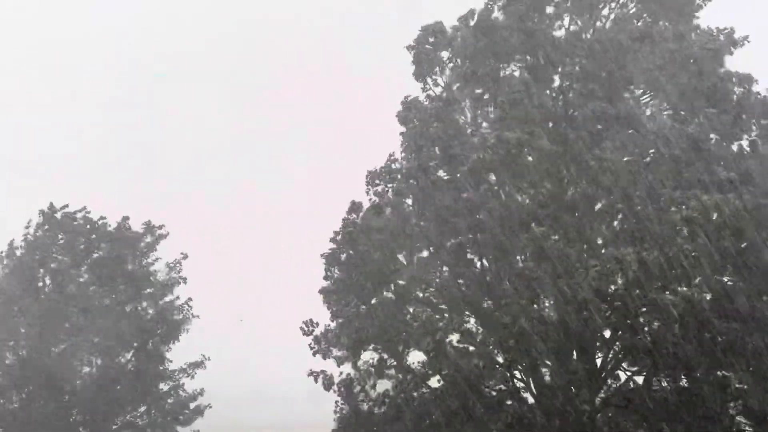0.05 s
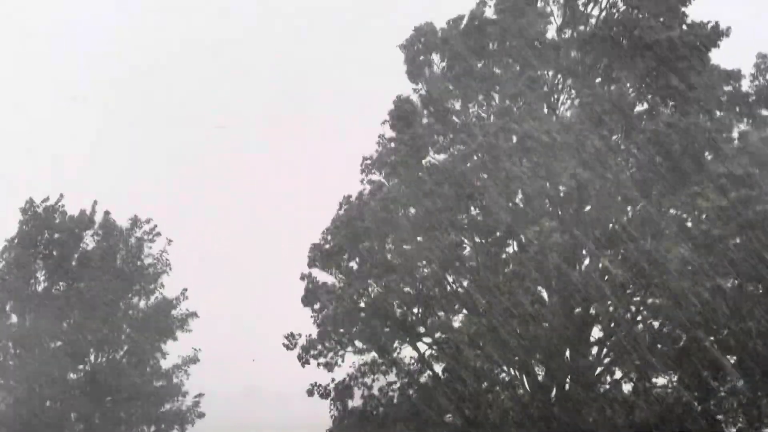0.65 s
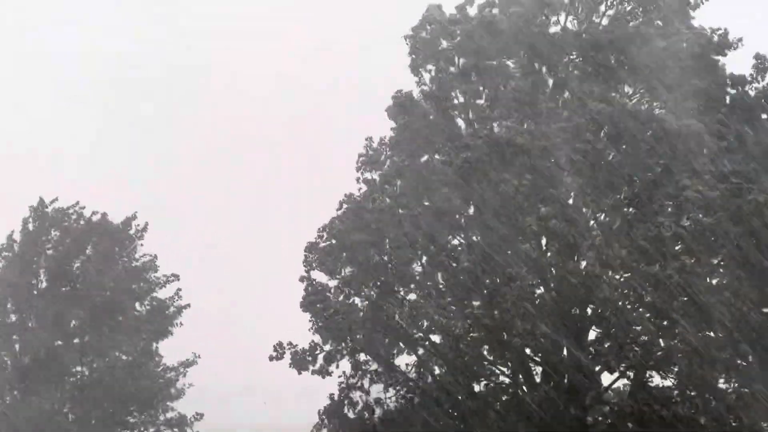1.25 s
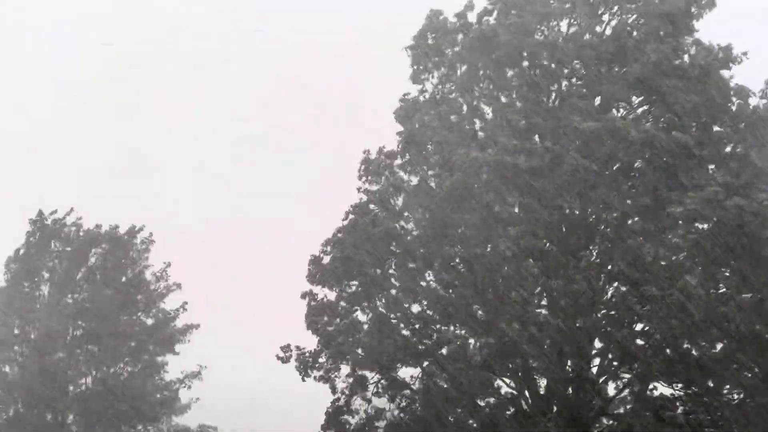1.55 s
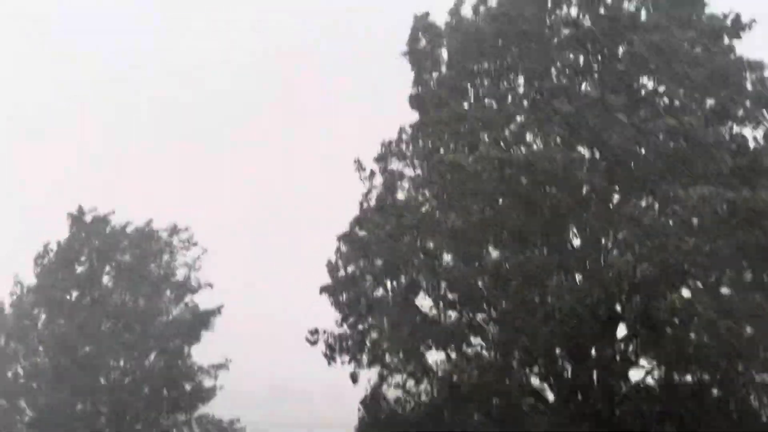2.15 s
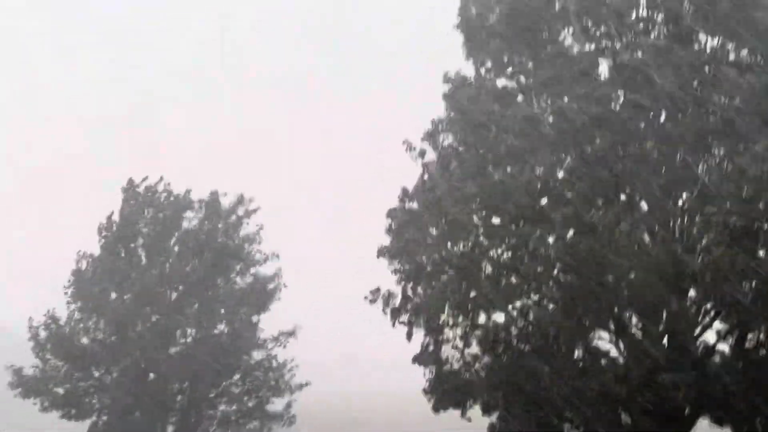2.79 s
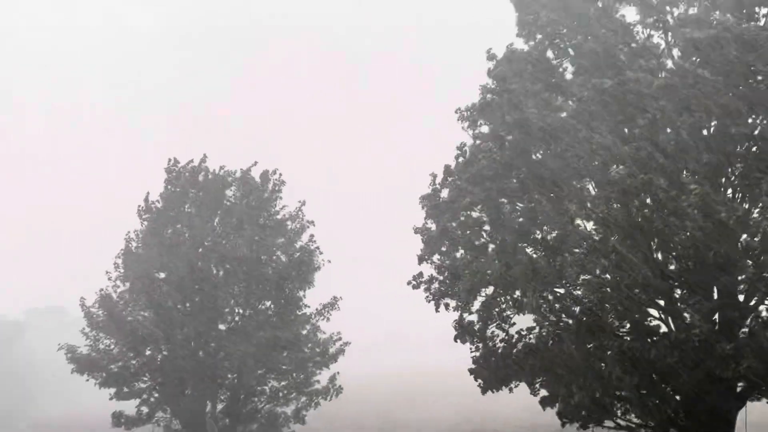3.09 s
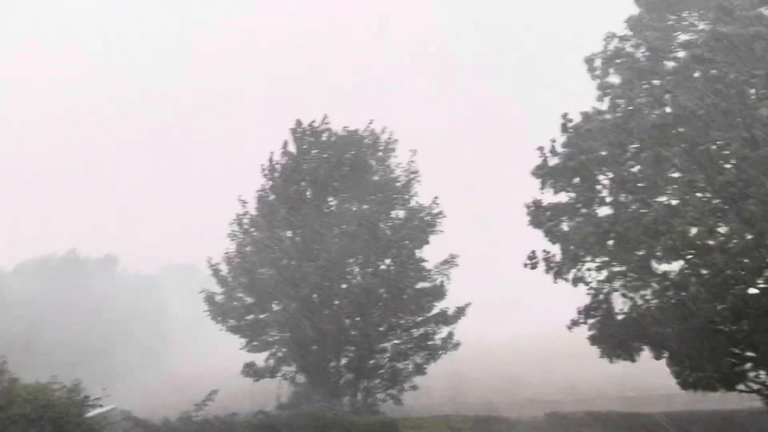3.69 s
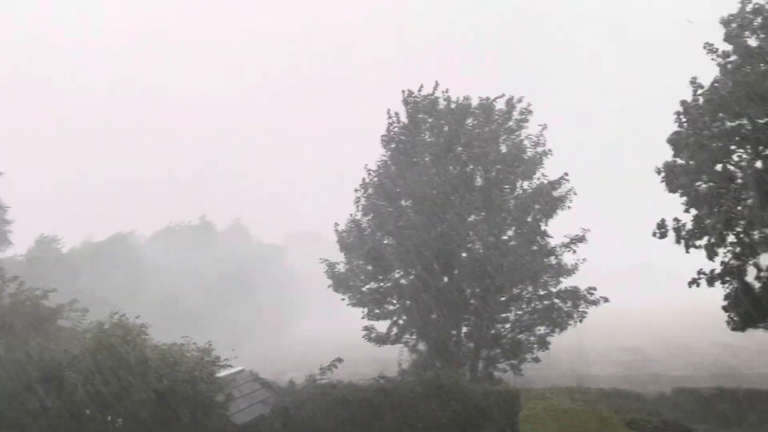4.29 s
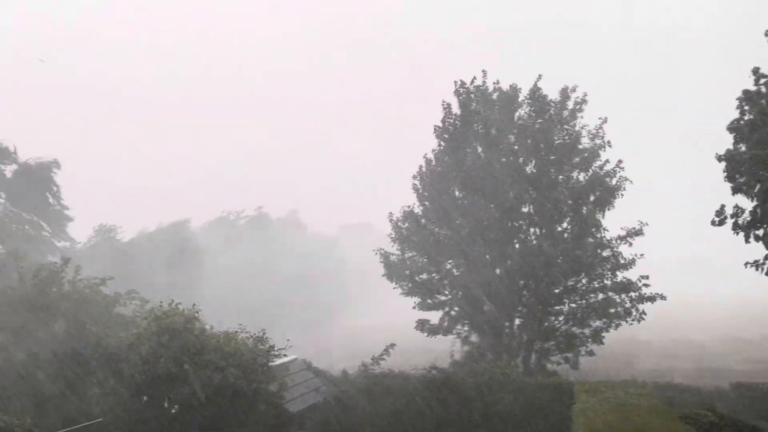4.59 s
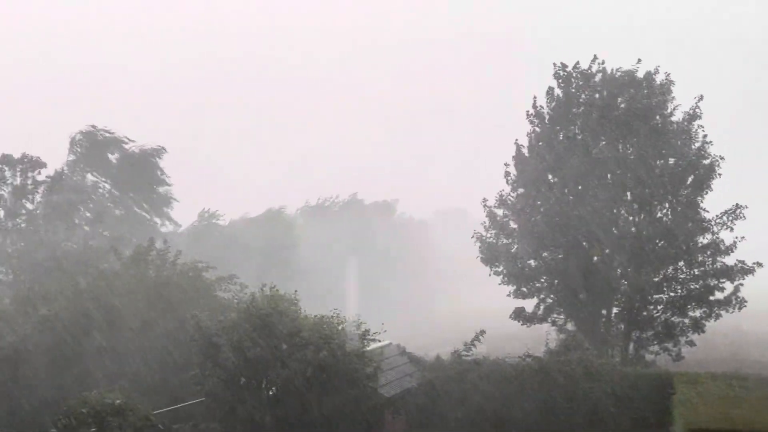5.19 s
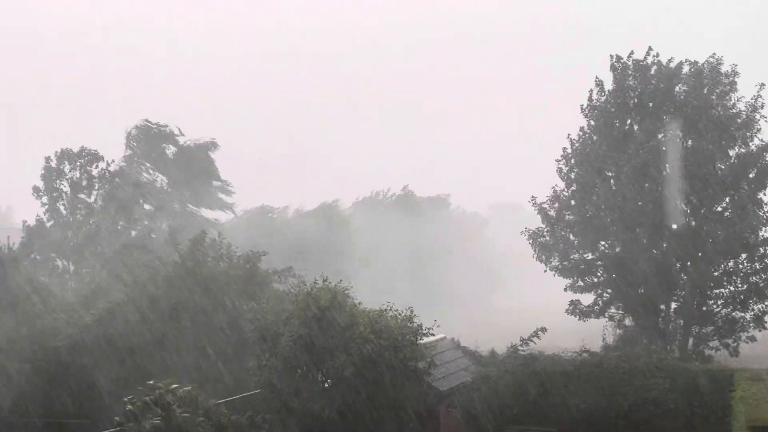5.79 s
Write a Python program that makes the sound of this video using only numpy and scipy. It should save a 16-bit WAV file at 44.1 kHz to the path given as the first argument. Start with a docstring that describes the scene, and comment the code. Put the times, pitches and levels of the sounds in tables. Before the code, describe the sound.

Torrential rain hisses steadily over a garden while trees roar in the wind and gusts rumble and thump on the microphone.

```python
"""Cloudburst over a garden

Countless drops on leaves and ground merge into a hiss, trees roar and moan in the wind, and a few
drops tick close by. A small stereo microphone is held out in the storm: gusts rumble and flutter
on its ports, and single eddies thump against them."""
import sys
import numpy as np
from scipy import signal
from scipy.fft import rfft, irfft
from scipy.io import wavfile
from scipy.ndimage import uniform_filter1d

SR = 44100
rng = np.random.default_rng(int(sys.argv[2]) if len(sys.argv) > 2 else 0)


def log_audio(samples):
    """Write samples as a 16-bit WAV file to the path given in sys.argv[1]."""
    # one column per channel
    frames = np.atleast_2d(samples).T
    # limit to full scale, then quantise
    limited = np.clip(frames, -1, 1)
    pcm = np.round(limited * 32767).astype(np.int16)
    wavfile.write(sys.argv[1], SR, pcm)


N = 266805


def from_db(db):
    """Amplitude grows tenfold for every 20 decibels."""
    return 10 ** (np.asarray(db) / 20)


def rms_one(x):
    """Normalisation to unit mean power."""
    return x / np.sqrt(np.mean(x ** 2) + 1e-20)


def in_time(rows):
    """Linear interpolation of each column at every sample; rows begin with a time in seconds."""
    s, *columns = np.transpose(rows)
    return [np.interp(np.arange(N) / SR, s, c) for c in columns]


def in_frequency(rows):
    """Interpolation of each column over log frequency, at every bin; rows begin with Hz."""
    hz, *columns = np.transpose(rows)
    bins = np.maximum(np.arange(N // 2 + 1) * SR / N, 1)
    return [np.interp(np.log(bins), np.log(np.sort(hz)), c) for c in columns]


def coloured(x, spectrum):
    """Spectral shaping, to rms 1. Each spectrum row: frequency in Hz, relative density in dB."""
    return rms_one(irfft(rfft(x) * from_db(in_frequency(spectrum)[0]), N))


def drift(corner_hz):
    """Low-passed noise gives a slow random fluctuation of rms 1."""
    hz = np.arange(N // 2 + 1) * SR / N
    return rms_one(irfft(rfft(rng.standard_normal(N)) / (1 + (hz / corner_hz) ** 4), N))


def swell(s, half_s):
    """A Gaussian envelope: 1 at time s, falling to 1/e at half_s to either side."""
    return np.exp(-np.minimum(((np.arange(N) / SR - s) / half_s) ** 2, 50))


def splashes(per_s, spread_db):
    """Shot noise: drops land at random as tiny clicks, many faint and far, a few near."""
    sizes = from_db(spread_db * np.minimum(rng.exponential(1, (2, N)), 5))
    signs = rng.choice([-1, 1], (2, N))
    landings = rng.random((2, N)) < per_s / SR
    return rms_one(sizes * signs * landings)


def rain():
    """Far impacts add incoherently to a wash; nearer ones slap leaves and spray hard ground."""
    # Strength of the downpour. Each row: time in seconds, hiss level in dB.
    downpour = [(0, -26), (.42, -27), (1.05, -27.5), (1.7, -27), (2.1, -27.5), (2.5, -28.5), (2.8, -29),
                (3.25, -30.5), (3.8, -30.5), (4.55, -30), (5.1, -31.5), (5.6, -32.5), (6.05, -32.5)]
    # Sheets of rain. Each row: centre and half length in seconds, rise in dB.
    sheets = [(0.21, 0.077, 0), (0.656, .13, 1.3), (1.23, 0.12, 1.2), (1.437, 0.12, 1.2), (2.9, .09, 0.8),
              (3.66, 0.031, 1), (4.61, 0.057, 0.5), (4.85, .04, 0.5), (5.28, 0.049, 1.2)]
    # Spectra of the three layers. Each row: frequency in Hz, relative density in dB.
    wash_spectrum = [(120, -0.5), (250, -7.5), (470, 1), (680, -7), (1300, -7), (1850, -4.5), (2400, -2),
                     (3000, -0.44), (3800, -2.5), (5000, -4.5), (6300, -8), (8000, -16), (11500, -15),
                     (14400, -19), (15600, -33)]
    slap_spectrum = [(300, -6), (1000, -1.5), (3000, -1.5), (6000, -6), (9000, -9), (15600, -33)]
    spray_spectrum = [(3000, -28), (7000, 3.5), (10000, 9), (12500, 0), (15600, -5.5)]
    hiss_db, = in_time(downpour)
    hiss_db += sum(rise_db * swell(s, half_s) for s, half_s, rise_db in sheets) + 0.4 * drift(10)
    wash = coloured(rng.standard_normal((2, N)), wash_spectrum)
    flurries = from_db(1.6 * drift(25))
    slaps = flurries * coloured(splashes(per_s=1200, spread_db=2.5), slap_spectrum)
    spray = coloured(splashes(per_s=2400, spread_db=1.0), spray_spectrum)
    spray_db = -43 + 0.8 * (hiss_db + 27) + 3.1 * drift(25)   # gains 0.8 dB per dB of hiss
    return from_db(hiss_db) * (from_db(1) * wash + from_db(-7.5) * slaps) + from_db(spray_db) * spray


def narrow_band(hz, width_hz):
    """Quadrature modulation shifts low-passed noise into a narrow band, heard as an airy note."""
    lowpass = signal.butter(2, width_hz / 2, fs=SR, output="sos")
    in_phase, quadrature = signal.sosfilt(lowpass, rng.standard_normal((2, 2, N)))
    phase = 2 * np.pi * hz * np.arange(N) / SR
    return rms_one(in_phase * np.cos(phase) + quadrature * np.sin(phase))


def trees():
    """Flow noise in the wet crowns: a broad roar, a faint tone that follows it, and swelling moans."""
    # Wind in the trees. Each row: time in seconds, roar level in dB.
    tree_wind = [(0, -35), (.45, -33), (.98, -36.5), (1.25, -33), (1.8, -39.5), (2.53, -44), (3.0, -37),
                 (3.65, -38.5), (4.08, -40.5), (4.3, -36.5), (4.65, -39.5), (4.98, -35.5), (5.6, -36),
                 (6.05, -35)]
    # Spectrum of the roar. Each row: frequency in Hz, relative density in dB.
    roar_spectrum = [(150, -37), (400, -2.5), (680, 1.5), (870, 3), (1100, -2), (1450, -4), (2000, -4.5),
                     (4000, -41)]
    # Moans of the wind; apart from these, a faint band of noise near 1770 Hz swells toward the end.
    # Each row: centre in seconds, crest level in dB, half length in seconds, pitch and bandwidth in Hz.
    band_swells = [(0.42, -37, 0.49, 455, 220), (0.42, -38, 0.82, 1447, 220),
                   (1.477, -35.5, 0.25, 496, 220), (1.522, -36, 0.26, 1457, 230),
                   (2.82, -32.5, 0.17, 426.5, 268), (4.33, -39, 0.27, 557.5, 260),
                   (5.302, -41, 0.51, 520.6, 169), (5.4, -47.5, 1.0, 1770, 130)]
    roar_db, = in_time(tree_wind)
    roar_gain = from_db(roar_db - 0.5 + drift(34))
    roar = roar_gain * coloured(rng.standard_normal((2, N)), roar_spectrum)
    undertone = from_db(roar_db - 6) * narrow_band(hz=512.5, width_hz=190)
    bands = sum(from_db(crest_db) * swell(s, half_s) * narrow_band(hz, width_hz)
                for s, crest_db, half_s, hz, width_hz in band_swells)
    return roar + undertone + bands


def turbulence(spectrum, span_s):
    """Random pressure fluctuation, divided by its running rms to hold its strength steady."""
    pressure = coloured(rng.standard_normal(N), spectrum)
    power = uniform_filter1d(pressure ** 2, max(int(span_s * SR), 2))
    return pressure / np.sqrt(np.maximum(power, 1e-9))


def buffeting():
    """Turbulent pressure on the ports: large eddies rumble, small ones flutter, shear is antiphase."""
    # Wind between gusts. Each row: time in seconds, rumble and flutter levels in dB.
    steady_wind = [(0.0, -23.5, -32.5), (0.55, -30.5, -30), (0.85, -29.5, -29), (1.28, -34.5, -31),
                   (1.58, -34.5, -31.5), (1.88, -34, -34), (1.93, -35, -38), (2.42, -35, -46),
                   (2.83, -41.5, -41), (3.02, -39, -33.5), (3.45, -37, -34.5), (4.15, -41, -34.5),
                   (4.52, -31.5, -31.5), (4.8, -30.5, -33), (5.0, -33.5, -33), (5.27, -31, -31),
                   (5.63, -33, -33.5), (6.05, -31, -32.5)]
    # Gusts. Each row: centre and half length in seconds, rises of rumble and flutter in dB.
    gusts = [(0.023, 0.07, -1, 5), (0.478, 0.028, 7, 10), (0.596, 0.055, 8, 4.5), (0.71, 0.029, 4.5, 2.5),
             (1.006, 0.076, 7, 7), (1.4, 0.037, 13, 7), (1.532, 0.023, 9.5, -2), (1.734, 0.059, 6.5, 7.5),
             (1.822, 0.019, 2, 6), (1.882, 0.014, 2, 8.5), (2.117, 0.027, 5.5, 5), (2.243, 0.038, 0, 8),
             (2.548, .025, 2, 14.5), (2.98, 0.062, 8, 5), (3.158, 0.047, 2, 5.5), (3.277, .05, 2.5, 4.5),
             (3.607, 0.029, 7, 6), (3.92, 0.06, 3, 2.5), (4.31, 0.036, 1, 2.5), (4.87, 0.059, 4, -2),
             (5.15, 0.06, 2, -0.5), (5.386, 0.038, 4, 2.5), (5.873, 0.07, 2, 1)]
    # Pressure spectra at the ports. Each row: frequency in Hz, relative density in dB.
    rumble_spectrum = [(15, -44), (25, -42), (40, -8), (60, 4.5), (90, -0.5), (125, -4.5), (200, -15),
                       (400, -33.5), (900, -108)]
    flutter_spectrum = [(70, -8.5), (130, -1.5), (190, 1.5), (250, -0.5), (320, -3), (420, -8.5),
                        (650, -16), (1100, -24.5), (3000, -81)]
    shear_spectrum = [(20, -32), (60, -1), (120, 0.5), (180, 6), (300, -0.5), (500, -11), (1000, -32),
                      (3000, -102)]
    rumble_db, flutter_db = in_time(steady_wind)
    for s, half_s, rumble_rise_db, flutter_rise_db in gusts:
        gust = swell(s, half_s)
        rumble_db += rumble_rise_db * gust
        flutter_db += flutter_rise_db * gust
    shear_db = -36 + 1.54 * (flutter_db + 27)   # gains 1.54 dB per dB of flutter
    rumble = from_db(rumble_db + 1.43 + 2.2 * drift(14)) * turbulence(rumble_spectrum, span_s=0.042)
    flutter = from_db(flutter_db - 0.5 + 1.86 * drift(42)) * turbulence(flutter_spectrum, span_s=0.039)
    shear = from_db(shear_db + 2.3 * drift(7.8)) * turbulence(shear_spectrum, span_s=0.078)
    return rumble + flutter + shear * np.array([[1], [-1]])


def thumps():
    """An eddy's low-pressure core sucks at the ports between two smaller pushes; its breakup rasps."""
    # Eddies that hit the ports. Each row: centre in seconds, peak suction in dB, pitch in Hz.
    eddies = [(0.006, -11.5, 101), (0.060, -9, 72), (0.084, -18, 220), (0.137, -17.5, 155.6),
              (0.268, -19, 60), (0.389, -16, 85), (0.46, -3, 100), (0.473, -5, 98), (0.4799, -7, 225),
              (0.5, -11, 93), (0.548, -16, 120), (0.571, -16, 120), (0.579, -17, 240), (0.584, -11, 62),
              (0.618, -5.5, 70), (0.672, -16, 110), (0.718, -14.5, 68), (0.868, -19, 100),
              (0.949, -17, 156), (0.961, -10.5, 88), (0.985, -12, 170), (0.995, -12, 130),
              (1.022, -13, 200), (1.044, -11.5, 260), (1.055, -19, 185), (1.348, -16.5, 120),
              (1.382, -14, 71), (1.393, -12, 290), (1.404, -9, 310), (1.414, -17, 143), (1.514, -16, 105),
              (1.539, -19, 169), (1.668, -17.5, 185), (1.728, -18, 243), (1.745, -21, 260),
              (1.755, -20, 120), (1.798, -17, 220), (1.803, -13, 480), (1.880, -21, 342), (1.910, -14, 420),
              (1.918, -16.5, 80), (2.113, -20.5, 250), (2.138, -20, 74), (2.258, -23, 300),
              (2.970, -23, 92), (2.989, -24, 308), (3.6, -15, 170), (3.608, -14.5, 165), (3.895, -21, 247),
              (3.945, -20.5, 118), (3.971, -18.5, 154), (4.292, -24, 300), (4.314, -22, 229),
              (4.364, -16.5, 98), (4.442, -18.5, 101), (4.623, -19.5, 115), (4.767, -23, 115),
              (4.795, -17.5, 85), (4.854, -16.5, 60), (4.901, -16.5, 71), (5.058, -7.5, 92),
              (5.059, -17, 230), (5.117, -20, 93), (5.16, -19, 65), (5.186, -18.5, 65), (5.23, -19, 94),
              (5.283, -18.5, 70), (5.383, -17, 120), (5.431, -17, 84.5), (5.608, -18, 76),
              (5.812, -14.5, 80), (5.875, -19, 70), (5.9, -18, 198), (6.015, -21, 85)]
    # Spectrum of a breaking eddy. Each row: frequency in Hz, relative density in dB.
    rasp_spectrum = [(100, -3), (250, 3), (400, -1), (600, -13), (850, -11.5), (2000, -40), (5000, -80)]
    reference_hz, reference_half_s = 101, 0.0068
    rasp_db, rasp_db_per_octave = -19.5, 5.5   # relative to the peak; small, fast eddies rasp most
    t, pressure, rasp_gain = np.arange(N) / SR, np.zeros(N), np.zeros(N)
    for s, peak_db, hz in eddies:
        near = slice(max(int((s - .06) * SR), 0), int((s + .06) * SR))
        since = t[near] - s
        half_s = reference_half_s * reference_hz / hz   # small eddies are higher and pass sooner
        envelope = from_db(peak_db) * np.exp(-(since / half_s) ** 2)
        pressure[near] -= envelope * np.cos(2 * np.pi * hz * since)
        rasp_gain[near] += envelope * from_db(rasp_db + rasp_db_per_octave * np.log2(hz / reference_hz))
    return pressure + rasp_gain * turbulence(rasp_spectrum, span_s=0.025)


def close_drops(decay_s=0.0013, band_hz=(4500, 14500)):
    """Impact transients: each nearby drop bursts into bright noise that decays exponentially."""
    # Drops landing close by. Each row: start in seconds, level before filtering in dB.
    drops = [(2.713, -19), (2.773, -23), (3.501, -27), (3.593, -25), (4.011, -27), (4.4116, -23),
             (4.771, -17.5), (5.3592, -24), (5.3916, -23), (5.447, -26.5), (5.9413, -24), (6.0197, -23)]
    t, envelope = np.arange(N) / SR, np.zeros(N)
    for s, level_db in drops:
        envelope += from_db(level_db) * (t >= s) * np.exp(-np.abs(t - s) / decay_s)
    bandpass = signal.butter(2, band_hz, "band", fs=SR, output="sos")
    return signal.sosfilt(bandpass, envelope * rng.standard_normal((2, N)) + 1e-18)


def widened(sound):
    """Stereo widening: the right channel is a phase-turned copy of the left plus unrelated sound."""
    # Right channel against left. Each row: frequency in Hz, coherence from 0 to 1,
    # phase shift in radians, level difference in dB.
    pair = [(150, .6, 0, -.4), (500, .62, 0, -1.3), (850, .47, 0, -.4), (1100, .25, .6, .4),
            (1550, .43, 2.0, 6.6), (1650, .5, 2.5, 6.8), (1700, .42, -.6, 6.4), (1900, .25, -.9, 5.6),
            (2400, .85, -.2, 1.8), (3000, .97, -.1, .4), (3600, 1, 0, 0), (5100, 1, 0, 0),
            (5500, .83, .75, 0), (6400, .8, .85, 0), (7300, .75, 1.6, 0), (7800, .99, 2.8, 0),
            (8400, 1, 3.14, 0), (8850, .99, 3.3, 0), (9100, .74, 3.6, 0), (10800, .76, 5.5, 0),
            (11200, 1, 6.28, 0), (12950, 1, 6.3, 0), (13250, .65, 7.0, 0), (14300, .6, 8.5, 0),
            (14700, 1, 9.4, 0)]
    coherence, phase, right_db = in_frequency(pair)
    coherence = np.clip(coherence, 0, 1)
    left, independent = rfft(sound)
    right = coherence * np.exp(1j * phase) * left + np.sqrt(1 - coherence ** 2) * independent
    return irfft(np.array([left, right * from_db(right_db)]), N)


def scene():
    """Superposition of rain and trees all around with wind on the microphone itself."""
    garden = rain() + trees() + close_drops()
    return widened(garden) + buffeting() + thumps()


def record(dry):
    """Band limiting and saturation: deep bass is thinned, hard thumps are rounded, the top is cut."""
    low_cut_hz, high_cut_hz, ceiling = 36, 15750, 0.85
    thinned = signal.sosfilt(signal.butter(2, low_cut_hz, "high", fs=SR, output="sos"), dry)
    rounded = thinned / (1 + (thinned / ceiling) ** 4) ** .25
    return signal.sosfilt(signal.ellip(12, .1, 90, high_cut_hz, fs=SR, output="sos"), rounded)


dry = scene()
out = record(dry)
log_audio(out)
```